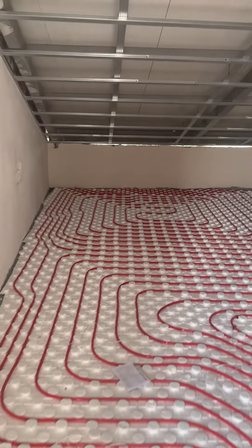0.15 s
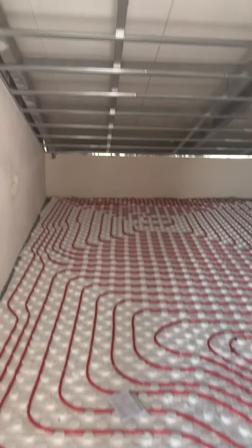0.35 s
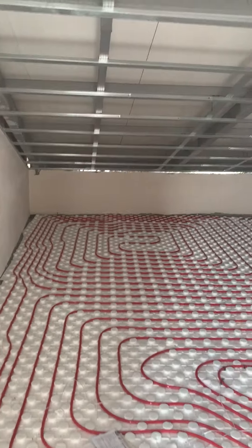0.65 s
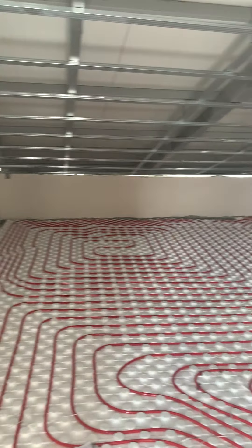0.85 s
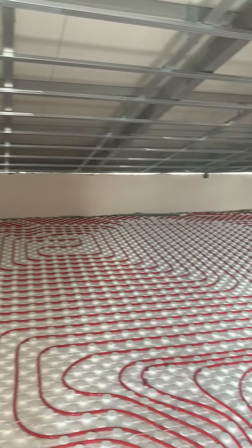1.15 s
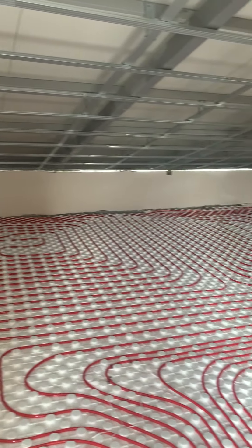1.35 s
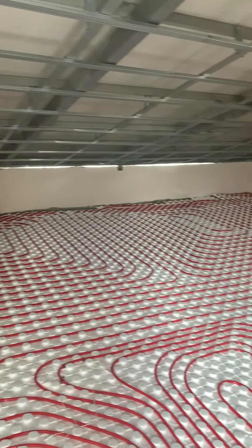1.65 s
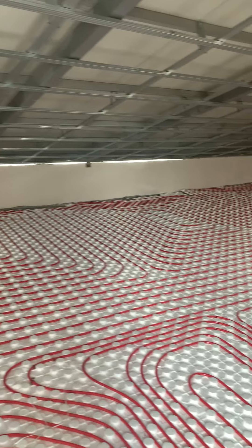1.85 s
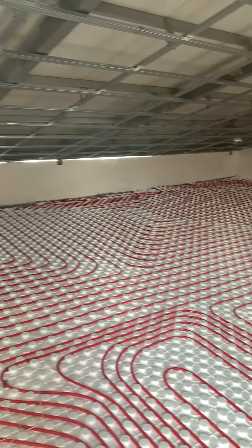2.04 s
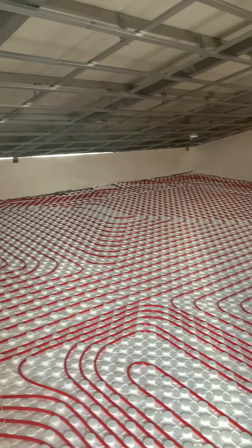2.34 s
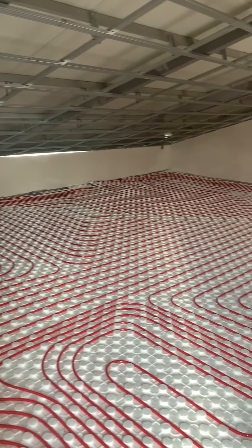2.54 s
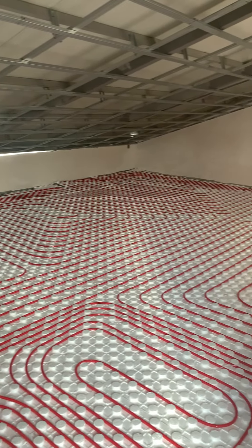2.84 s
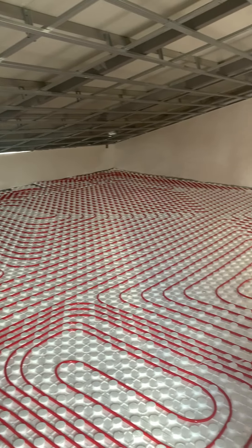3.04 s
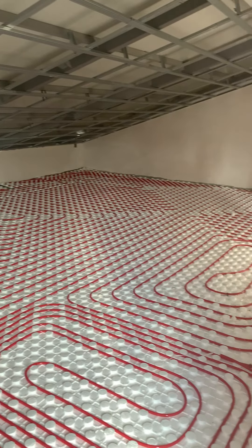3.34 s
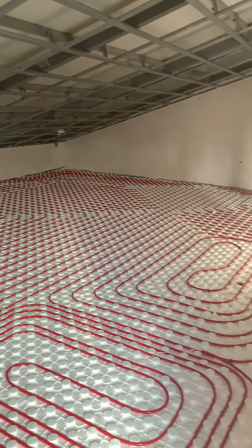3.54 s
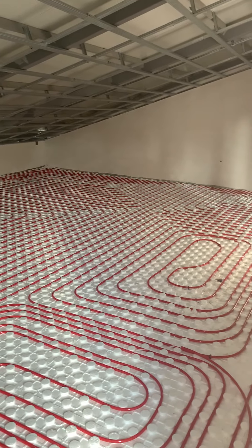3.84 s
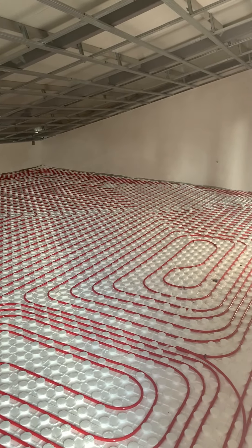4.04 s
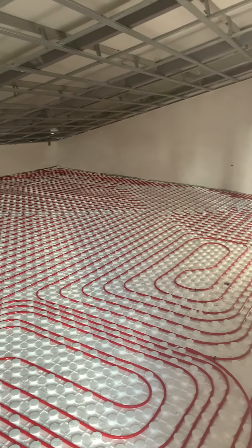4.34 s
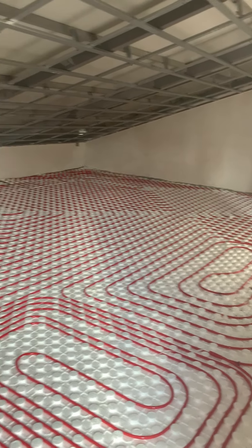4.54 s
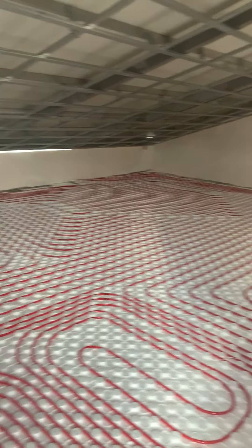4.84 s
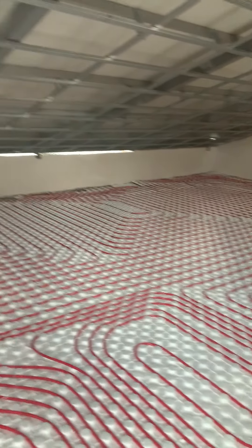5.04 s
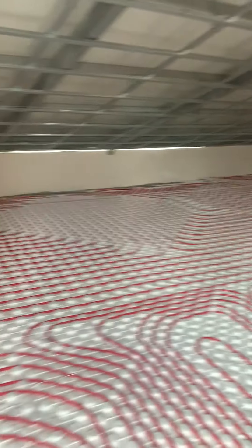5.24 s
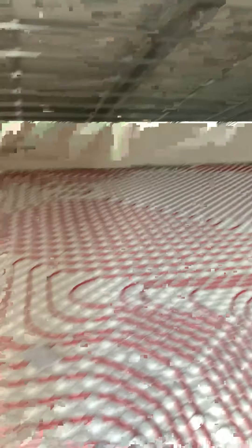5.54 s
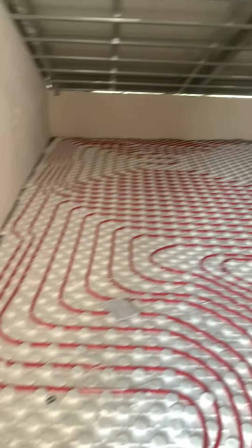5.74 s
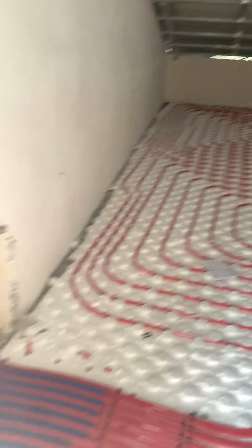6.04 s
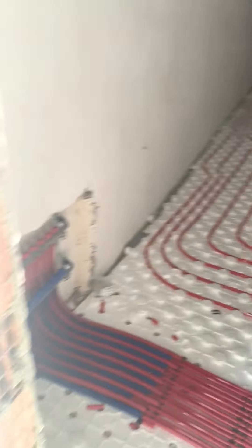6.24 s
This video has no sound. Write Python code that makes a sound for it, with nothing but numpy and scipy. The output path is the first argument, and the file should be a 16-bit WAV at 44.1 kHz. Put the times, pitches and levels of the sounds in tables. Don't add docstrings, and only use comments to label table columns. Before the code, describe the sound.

Deep diesel hum grows steadily indoors while cloth rustles, a tap and scuff land early, and gritty footsteps scrape near the end.

```python
import sys
import numpy as np
from scipy import signal
from scipy.fft import rfft, irfft, next_fast_len
from scipy.io import wavfile
from scipy.ndimage import uniform_filter1d, map_coordinates

SR = 44100
rng = np.random.default_rng(int(sys.argv[2]) if len(sys.argv) > 2 else 0)


def master(y):
    cut = np.clip(np.atleast_2d(y).T, -1, 1)
    pcm = np.round(cut * 32767)
    wavfile.write(sys.argv[1], SR, pcm.astype(np.int16))


def amplitude_ratio(level_db):
    exponent = np.asarray(level_db, float) / 20
    return 10 ** exponent


N = 281358

# time_s, place_rad
PLACE_PATH = [(0, -3), (.3, -2), (.55, -0.84), (1, -0.64), (1.85, -0.4), (2.3, .02), (3.0, 0.8), (3.55, 2),
              (4.0, 3), (4.45, 2), (4.66, 1.1), (4.85, 0.2), (5.2, -0.9), (5.45, -1.2), (5.9, -1.2),
              (6.38, -3.5)]
# place_rad, whine_db (re firing), panel_db, roar_db
ROOM_FIELD = [(-2, -4.5, 3.5, 0.7), (-2.33, -5.5, 2, 1.5), (-1.36, 0, -21, 1), (-0.43, -7.5, -6, -0.1),
              (0.24, -5, -2, -2), (0.75, -7, -1, -.5), (1.2, -7.5, 1, -0.4), (3.5, -3.5, 4, 0)]
# time_s, firing_level_db
GAIN_PATH = [(0, -45), (.35, -42.5), (.8, -38.5), (1.24, -38.5), (2.5, -35), (3.1, -33), (4.4, -31),
             (4.9, -30), (6.2, -28), (6.38, -25.5)]
# freq_hz, likeness_0_to_1
PORT_LIKENESS = [(400, 1), (580, 0.86), (750, 0.92), (1000, 0.99), (1600, 0.89), (2600, 0.97), (4500, 0.72),
                 (7000, 0.37), (9300, 0.82), (10300, 0.94), (11000, 0.38), (12000, 0.8)]
# start_s, peak_db, pitch_hz, t60_s, right_re_left
TAPS = [
    (.757, -22, 1240, .035, 1),
    (.761, -29, 3400, .02, 1),
    (.773, -29, 1180, .025, 1),
    (1.497, -35, 740, .035, -.6),
    (1.499, -43, 1150, .02, -.6),
    (5.0905, -27, 3800, .008, 1),
    (6.2375, -26, 3400, .01, 1),
]
# peak_s, level_db, rise_s, fall_s
SCUFFS = [
    (0.762, -35.5, 0.0054, 0.0077),
    (.776, -39.5, 0.015, 0.068),
    (1.08, -53, 0.022, 0.065),
    (5.35, -40, 0.017, 0.059),
    (5.88, -33, 0.013, 0.063),
    (6.101, -29.5, 0.052, 0.023),
    (6.21, -35, 0.028, 0.045),
]
# start_s, peak_db, centre_hz
GRIT_TICKS = [
    (.1036, -39, 3200),
    (.3755, -42, 7000),
    (5.0915, -33, 6500),
    (5.22, -49, 10000),
    (5.52, -52, 8000),
    (5.675, -49, 9000),
    (6.172, -38, 6000),
    (6.238, -31, 5500),
]
# centre_hz, width_hz, level_db
SCUFF_RESONANCES = [(1260, 240, -1), (1860, 260, 0), (3020, 300, -9)]
# freq_hz, density_db_per_hz
CLOTH_SPECTRUM = [(300, -42), (600, -5.5), (900, -2), (1600, -5), (2500, -6), (4500, -16.5), (6200, -16.5),
                  (8000, -23.5), (11000, -29.5), (13500, -28.5), (15500, -39), (17000, -82)]
# peak_s, level_db, rise_s, fall_s, low_body_db
CLOTH_STROKES = [(0.0, -60.5, .02, 0.12, -1.5), (.072, -58.5, 0.007, 0.056, 3),
                 (.21, -61.5, .04, 0.13, 1.5), (.376, -63.5, 0.0034, 0.21, -25),
                 (0.721, -57.5, 0.0066, .03, -8), (.764, -46, .015, 0.028, -8),
                 (.82, -62, 0.023, 0.11, 0.5), (.99, -63.5, 0.023, 0.057, -12), (1.09, -59, 0.045, .05, -2),
                 (1.19, -61.5, 0.054, 0.089, -12), (1.33, -64.5, 0.088, .05, -9),
                 (4.484, -60, .008, 0.095, 2), (5.094, -56, .003, 0.011, -9), (5.15, -62, .05, 0.11, -10),
                 (5.376, -50, 0.097, 0.099, -4.5), (5.685, -54, .006, 0.11, 4),
                 (5.872, -46.5, 0.045, 0.16, -4), (6.113, -45, .06, .03, -2),
                 (6.172, -52, 0.0039, 0.0092, 7), (6.24, -52.5, .06, 0.16, 1.5)]
# cycle_multiple, level_db
ENGINE_ORDERS = [(3, -51.5), (4, -50.5), (6, -32), (7, -43.5), (9, -49.5), (10, -53), (11, -56),
                 (12, -43.5), (13, -53), (15, -48.5), (18, -67), (20, -49.5), (30, -52.5), (31, -59),
                 (34, -50.5), (35, -67), (40, -50.5), (45, -56.5), (48, -58), (60, -68), (63, -63),
                 (72, -63.5), (75, -61), (84, -73.5)]
# freq_hz, density_db_per_hz
ROAR_SPECTRUM = [(15, -59), (40, -14.5), (58, 2.5), (76, 2.5), (90, -3.5), (140, -2.5), (300, -5),
                 (450, -3.5), (700, -11.5), (1000, -13), (2000, -17), (3500, -23.5), (6200, -29),
                 (9000, -42), (13000, -52.5), (16000, -71)]
# centre_hz, width_hz, level_db
DUCT_RESONANCE = (345, 12, 3.7)
# centre_hz, width_hz, level_db (re firing)
PANEL_RESONANCE = (1300, 210, -18)
# time_s, edge_hz
PHASE_EDGE = [(0, 390), (.42, 313), (.56, 225), (.64, 380), (.8, 470), (1.2, 567), (2.4, 609), (3.8, 621),
              (4.3, 584), (4.7, 532), (5.5, 530), (5.9, 616), (6.38, 664)]
# freq_hz, lead_rad
LEFT_LEAD = [(700, -3), (1050, -3.4), (1600, -4), (1950, -4.1), (2300, -3.4), (2900, -3.6), (3850, -4.8),
             (5200, -3.95), (6900, -5.9), (9300, -3.14), (10500, -3), (11600, -.1), (13200, 0),
             (13800, 3.14)]
# freq_hz, drift_rad
PHASE_DRIFT = [(450, 0), (600, 0.32), (900, 0.54), (1600, 0.21), (2600, 0.44), (4500, 0.66), (7000, 1),
               (9300, 0.065), (10200, 0.21), (11000, 0.99), (12000, 0.014), (14000, 0.16)]

CYLINDERS, FIRING_HZ = 6, 104.87
CYCLE_HZ = FIRING_HZ / CYLINDERS
T_S = np.arange(N) / SR


def unit(x):
    return x / np.sqrt(np.mean(np.abs(x) ** 2) + 1e-20)


def along(points, hz):
    point_hz, values = np.transpose(points)
    return np.interp(np.log(hz + 1), np.log(point_hz + 1), values)


def curves(rows):
    time_s, *columns = np.transpose(rows)
    return [np.interp(T_S, time_s, column) for column in columns]


def wobble(rate_hz):
    knots = rng.standard_normal(int(N * 40 / SR) + 4)
    return map_coordinates(knots, [np.arange(N) * min(rate_hz, 40) / SR])


def patches(shape, bins, frames):
    field = uniform_filter1d(rng.standard_normal(shape), bins, axis=0)
    return unit(uniform_filter1d(field, frames, axis=1))


def peak(hz, centre_hz, width_hz):
    return 1 / np.sqrt(1 + (2 * (hz - centre_hz) / width_hz) ** 2)


def noise(response):
    size = next_fast_len(N + 8192)
    hz = np.fft.rfftfreq(size, 1 / SR)
    turn = np.arccos(np.clip(along(PORT_LIKENESS, hz), 0, 1)) / 2
    spectra = rfft(rng.standard_normal((2, N)), size) * response(hz)
    shared, own = irfft(spectra * [np.cos(turn), np.sin(turn)], size)[:, :N]
    return unit(np.array([shared + own, shared - own]))


def tone(hz, drift_db, rate_hz):
    phase = 2 * np.pi * (hz * T_S + rng.random()) + 0.099 * drift_db * wobble(rate_hz)
    return np.sqrt(2) * amplitude_ratio(drift_db * wobble(rate_hz)) * np.sin(phase)


def heard_here():
    place_rad, = curves(PLACE_PATH)
    at_rad, *levels_db = np.transpose(ROOM_FIELD)
    return place_rad, *(np.interp(place_rad, at_rad, db) for db in levels_db)


def room_boom():
    place_rad = heard_here()[0]

    def standing(node_share):
        return np.sqrt(np.sin(place_rad) ** 2 + node_share ** 2)

    boom = standing(0.11) * tone(58.8, drift_db=0.8, rate_hz=6)
    rumble = standing(0.36) * noise(lambda f: peak(f, 46, 22) ** 4)
    return amplitude_ratio(-6) * (boom + amplitude_ratio(-11.5) * rumble)


def gear_whine():
    whine_db = heard_here()[1]
    return amplitude_ratio(whine_db) * tone(471.05, drift_db=0.4, rate_hz=12)


def shell_taps():
    out = np.zeros((2, N))
    for start_s, peak_db, hz, t60_s, right in TAPS:
        t = np.maximum(T_S - start_s, 0)
        envelope = amplitude_ratio(peak_db - 60 * t / t60_s) * (1 - np.exp(-t / 0.002))
        out += envelope * 2 * np.sin(2 * np.pi * hz * t) * np.array([[1], [right]])
    return out


def shoe_scuffs():
    swell = np.zeros(N)
    for peak_s, level_db, rise_s, fall_s in SCUFFS:
        swell += amplitude_ratio(level_db) * np.exp(-np.abs(T_S - peak_s) / np.where(T_S < peak_s, rise_s, fall_s))
    floor = noise(lambda f: sum(amplitude_ratio(db) * peak(f, hz, width_hz) ** 2 for hz, width_hz, db in SCUFF_RESONANCES))
    return swell * floor


def grit_ticks():
    out = np.zeros(N)
    for start_s, peak_db, hz in GRIT_TICKS:
        grit = noise(lambda f: peak(f, hz, 1.3 * hz) * f ** 2 / (f ** 2 + hz ** 2 / 4))[0]
        out += amplitude_ratio(peak_db) * np.exp(-np.abs(T_S - start_s) / 0.00081) * (T_S >= start_s) * grit
    return out


def cloth_rustle():
    split_hz, roundness = 2500, 1.13
    fizz = noise(lambda f: amplitude_ratio(along(CLOTH_SPECTRUM, f)) * f ** 2 / (f ** 2 + split_hz ** 2))
    body = noise(lambda f: amplitude_ratio(along(CLOTH_SPECTRUM, f)) * split_hz ** 2 / (f ** 2 + split_hz ** 2))
    fine_grain = unit(uniform_filter1d(rng.standard_normal(N), 90))
    grain = amplitude_ratio(1.5 * wobble(38) + 0.5 * fine_grain)
    fizz_swell, body_swell = np.zeros(N), np.zeros(N)
    for peak_s, level_db, rise_s, fall_s, body_db in CLOTH_STROKES:
        distance = np.abs(T_S - peak_s) / np.where(T_S < peak_s, rise_s, fall_s)
        swell = amplitude_ratio(level_db + 9.5) * np.exp(-distance ** roundness)
        fizz_swell += swell
        body_swell += swell * amplitude_ratio(body_db + 4)
    z = signal.stft(fizz_swell * fizz + body_swell * body, nperseg=256)[2]
    folds = amplitude_ratio(2.5 * patches(z.shape[1:], 3, 14))
    return grain * signal.istft(z * folds, nperseg=256)[1][:, :N]


def panel_ring():
    centre_hz, width_hz, level_db = PANEL_RESONANCE
    panel_db = heard_here()[2]
    return amplitude_ratio(level_db + panel_db) * noise(lambda f: peak(f, centre_hz, width_hz) ** 2)


def engine_roar():
    centre_hz, width_hz, duct_db = DUCT_RESONANCE
    door_db, door_s = 7, 0.51
    level_db = -1 + heard_here()[3] + door_db * np.exp(-(T_S / door_s) ** 2)
    roar = noise(lambda f: amplitude_ratio(along(ROAR_SPECTRUM, f)) * (1 + amplitude_ratio(duct_db) * peak(f, centre_hz, width_hz) ** 2))
    throb = 1 + 0.04 * np.sin(2 * np.pi * 4 * CYCLE_HZ * T_S)
    return amplitude_ratio(level_db - 4.5 + 0.51 * wobble(5)) * throb * roar


def firing_orders():
    upper_db, shade_db, shade_at_s, shade_s = 2.5, -7, 4.65, 1.15
    upper_gain = amplitude_ratio(upper_db + shade_db * np.exp(-((T_S - shade_at_s) / shade_s) ** 2 / 2))
    firing_db = dict(ENGINE_ORDERS)[CYLINDERS]
    out = np.zeros(N)
    for order, level_db in ENGINE_ORDERS:
        drift_db = min(0.3 + 0.05 * order, 1.1)
        line = amplitude_ratio(level_db - firing_db) * tone(order * CYCLE_HZ, drift_db, rate_hz=3)
        out += line * (upper_gain if order > 5 * CYLINDERS else 1)
    return out


def engine():
    level_db, = curves(GAIN_PATH)
    return amplitude_ratio(level_db) * (room_boom() + gear_whine() + panel_ring() + engine_roar() + firing_orders())


def scene():
    return shell_taps() + shoe_scuffs() + grit_ticks() + cloth_rustle() + engine()


def stereo_stage(dry):
    edge_width_hz = 51.5
    hz, t, z = signal.stft(dry, SR, nperseg=1024, noverlap=768)
    time_s, edge_hz = np.transpose(PHASE_EDGE)
    above_hz = hz[:, None] - np.interp(t, time_s, edge_hz)
    above = 0.5 + 0.5 * np.tanh(above_hz / (2 * edge_width_hz))
    drift_rad = along(PHASE_DRIFT, hz)[:, None] * patches(above.shape, 3, 16)
    half = np.exp(0.5j * (above * along(LEFT_LEAD, hz)[:, None] + drift_rad))
    return signal.istft(z * np.array([half, 1 / half]), SR, nperseg=1024, noverlap=768)[1][:, :N]


def top_cut(x):
    return signal.sosfilt(signal.butter(12, 15700, fs=SR, output="sos"), x)


def record(dry):
    wet = stereo_stage(dry)
    return top_cut(wet)


dry = scene()
out = record(dry)
master(out)
```